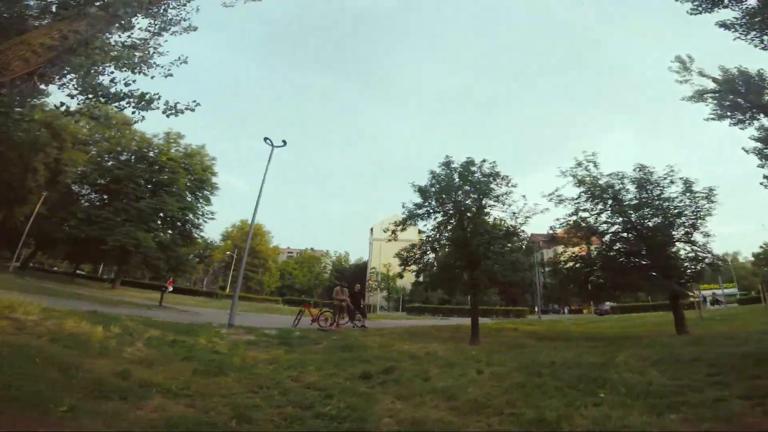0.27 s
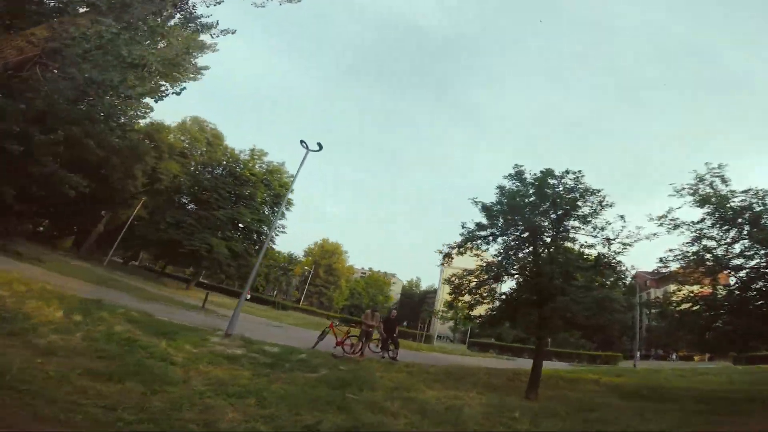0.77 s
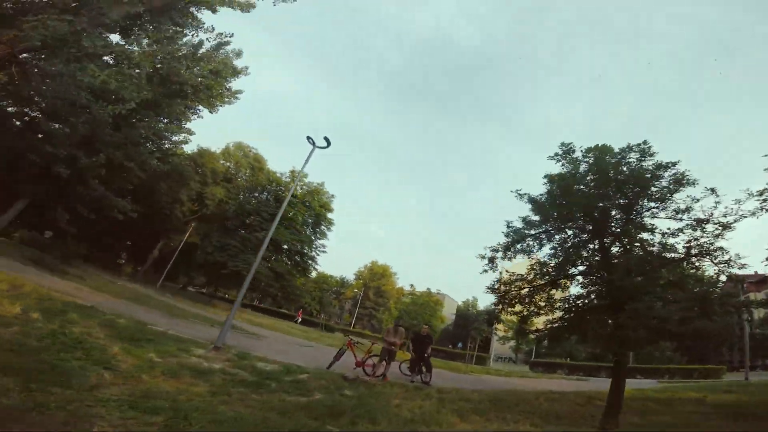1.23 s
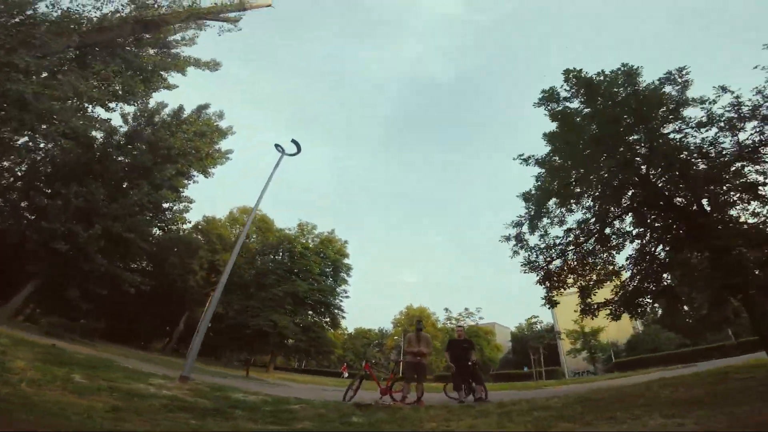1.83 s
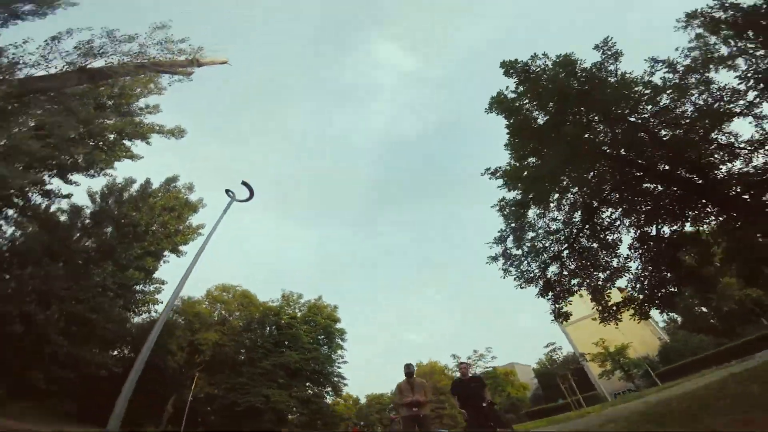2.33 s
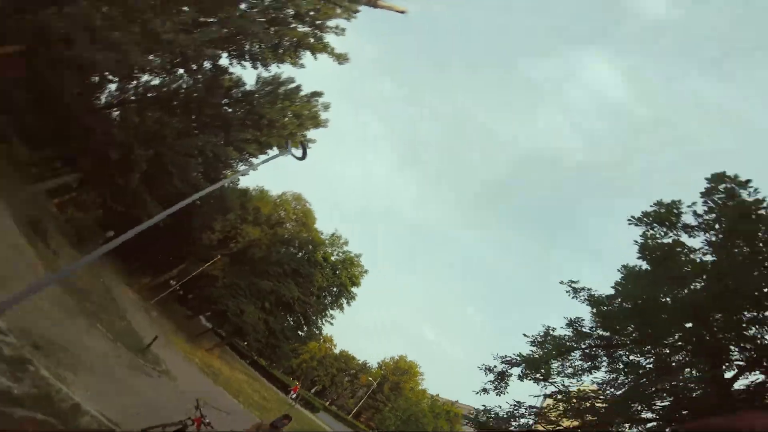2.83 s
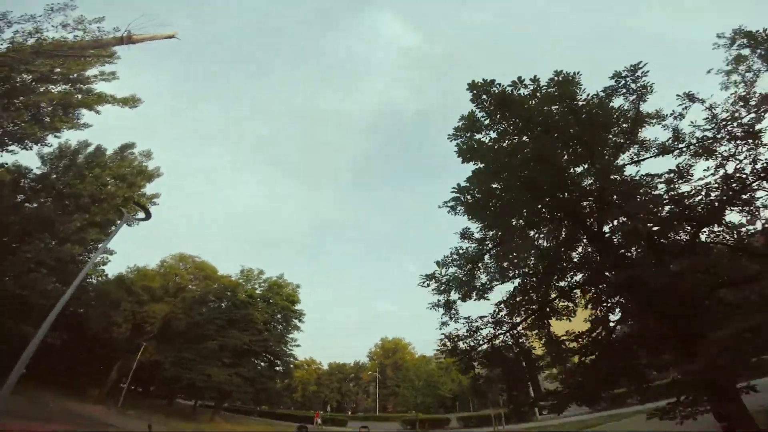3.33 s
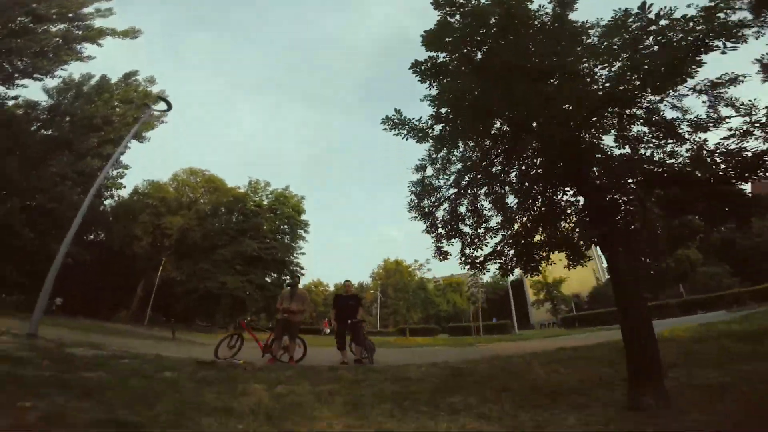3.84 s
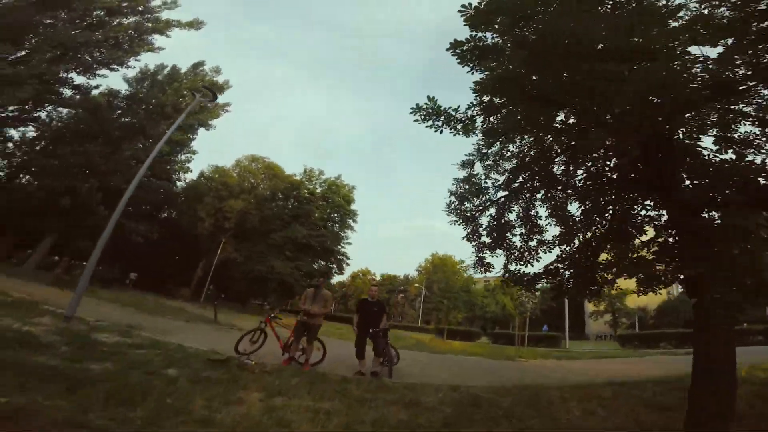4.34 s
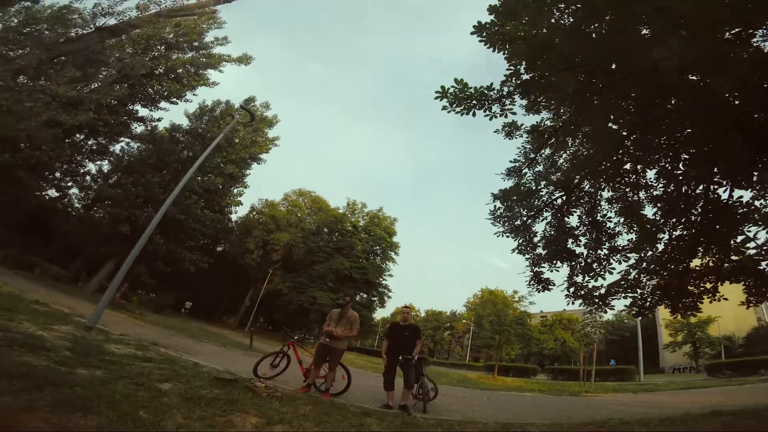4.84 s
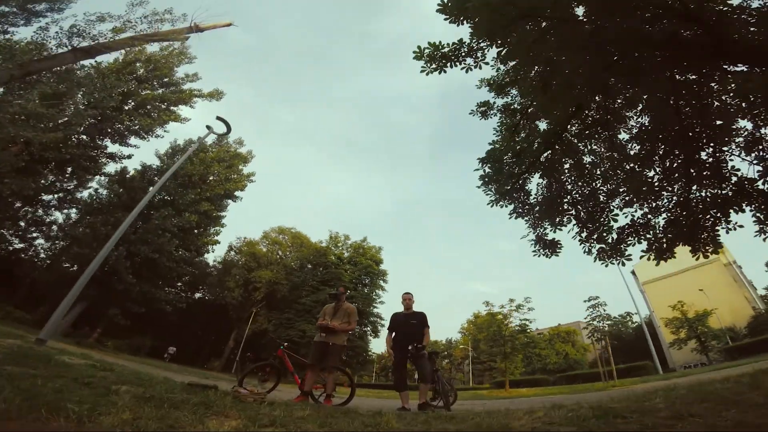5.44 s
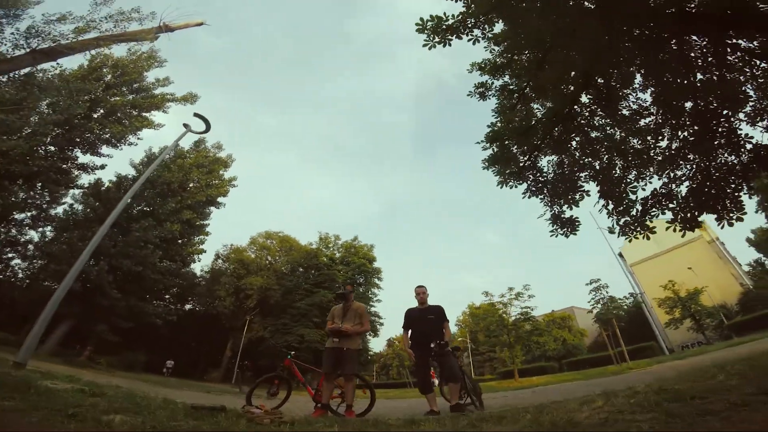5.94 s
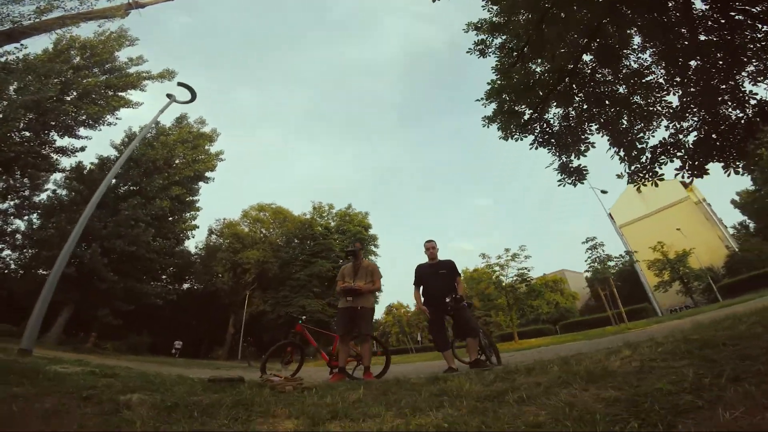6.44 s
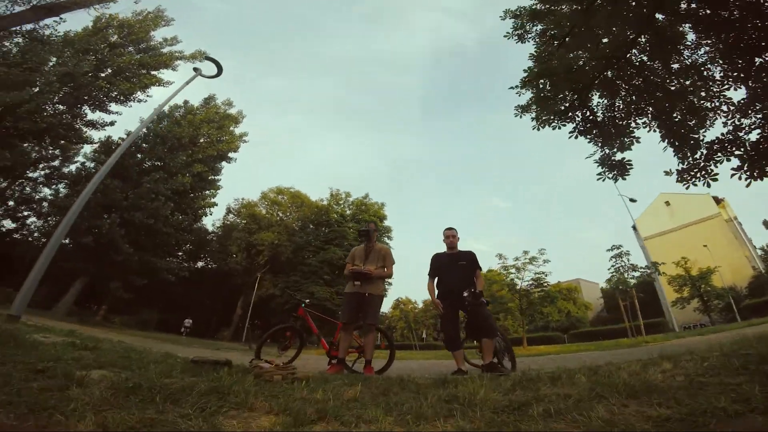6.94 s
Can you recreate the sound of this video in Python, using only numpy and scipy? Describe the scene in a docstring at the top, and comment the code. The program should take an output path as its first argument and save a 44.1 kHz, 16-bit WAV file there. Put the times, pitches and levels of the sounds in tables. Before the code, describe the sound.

A small four-rotor drone is heard from its own camera, very close and dry, outdoors. From 0 s it buzzes in a thick, beating hum with airy propeller wash, rising gently until 0.4 s, then sinking to a lower, rougher drone by 1.1 s. It climbs slowly and at 2.2 s leaps about an octave to a hard scream, peaking near 2.3 s and collapsing by 2.5 s. Until 3.4 s only thin, wavering electric whine, faint low chopping and airflow remain, with a rough, rasping blip at 2.7 s. Turbulent bursts surge at 3.6 s and 4.05 s, with a dip between, then drop to idle whine around 4.4 s. At 4.8 s the motors catch roughly and rise to 5.2 s, with low wind thumps. From 5.3 s the hover wavers, swelling at 5.7 and 6.75 s, before an abrupt upward rev at 7.1-7.2 s.

```python
"""A surging multi-rotor drone comes first: a small quadcopter flies low over a park, heard at its camera.
Four drifting motors turn three-bladed propellers: blades give harmonics of shaft speed, imbalance hums in the frame.
Wash, tip hiss, torn flow and wind are shaped noise; shaft speed and rough air set the levels of the rotor layers.
The throttle is punched and chopped twice; at idle mainly a thin electric whine and the airflow remain.
"""
import sys
import numpy as np
from scipy.fft import rfft, irfft, next_fast_len
from scipy.io import wavfile
from scipy.ndimage import uniform_filter1d, minimum_filter1d, map_coordinates

SR = 44100
rng = np.random.default_rng(int(sys.argv[2]) if len(sys.argv) > 2 else 0)


def master(y):
    """Save y as 16-bit WAV."""
    cut = np.clip(np.atleast_2d(y).T, -1, 1)
    pcm = np.round(cut * 32767)  # scale
    wavfile.write(sys.argv[1], SR, pcm.astype(np.int16))


N = 317079

# Faint steady hiss, relative density: frequency_hz, level_db_per_hz
FLOOR_SPECTRUM = [(1000, -0.5), (4000, -0.5), (7000, 0.5), (10000, 0), (12000, -8), (14000, -21),
                  (15500, -36)]
# Faint band-limited noise, opposite in the two channels, relative density: frequency_hz, level_db_per_hz
ANTIPHASE_SPECTRUM = [(150, -46), (260, -23.5), (340, -15), (385, 2.5), (440, -15), (560, -27), (720, -24),
                      (820, -6), (920, -38), (1900, -34.5), (2300, -24), (2800, -29), (5000, -49)]
# Level of the antiphase noise: time_s, level_db
ANTIPHASE_LEVEL = [(0, -50), (1.15, -49), (1.4, -79), (2.1, -61), (2.9, -58), (4.7, -69.5), (5.5, -92)]
# Wind on the microphone, dying down as the craft settles into a hover: time_s, level_db
WIND = [(0, -40.5), (.75, -42.5), (1.3, -34), (1.55, -37.5), (2.7, -38.5), (3, -44), (3.55, -34.5),
        (3.95, -37.5), (5.25, -37), (5.8, -45.5), (6.5, -44.5), (7.19, -41)]
# Gusts that thump the case in quick turns: centre_s, half_length_s, level_db
GUSTS = [(1.72, 0.083, -42), (2.205, 0.045, -35), (2.343, 0.033, -35), (2.428, 0.042, -36),
         (2.72, 0.07, -33), (3.342, .04, -39), (3.594, 0.13, -31), (4.798, 0.069, -34), (5.16, 0.077, -34)]
# Low wind rumble, relative density: frequency_hz, level_db_per_hz
RUMBLE_SPECTRUM = [(10, -6), (20, 5.5), (32, 1), (48, 3), (70, -3.5), (130, -23), (400, -76)]
# Wind buffeting, relative density: frequency_hz, level_db_per_hz
BUFFET_SPECTRUM = [(35, -27), (60, 4), (85, 0.5), (125, 1), (200, 4), (280, -19.5), (400, -18.5),
                   (900, -72)]
# Propeller wash, relative density: frequency_hz, level_db_per_hz
WASH_SPECTRUM = [(120, -26), (220, -21), (290, -12), (400, 8), (560, 0), (800, -1), (1100, -6), (1700, -7),
                 (2300, -17.5), (3000, -14), (3700, -30), (6000, -49), (12000, -79)]
# Flow torn by the blades in rough air, relative density: frequency_hz, level_db_per_hz
TEARING_SPECTRUM = [(2500, -25), (3900, 0), (4700, 5), (6000, 1.5), (8000, -10), (11000, -28)]
# Blade tip hiss, relative density: frequency_hz, level_db_per_hz
HISS_SPECTRUM = [(900, -38.5), (2000, 4.5), (2500, 0), (3050, 11), (3500, -1), (4100, -10), (5300, 0),
                 (6500, 4), (7600, -1.5), (9200, -5.5), (11000, -17.5), (13000, -25), (15500, -37)]
# Left-right correlation of the tip hiss: frequency_hz, correlation_ratio
EAR_LIKENESS = [(2000, 1), (5000, 1), (8000, 1), (12000, 0.99)]
# Difference between the two microphone ports: frequency_hz, level_db
PORT_DIFFERENCE = [(60, -52), (110, -63), (200, -70), (380, -54), (700, -63), (1290, -54.5), (2380, -36),
                   (4400, -33), (8120, -1), (15000, -3)]
# How the camera case passes the motor whine: frequency_hz, gain_db
CASE_RESPONSE = [(3500, -2), (4500, -6), (5100, -1), (5800, -4), (6500, 2), (7100, -8), (8300, -2),
                 (9500, -4), (11000, -11), (12000, -18), (15000, -43)]
# The motors: name, trim_share_of_shaft_speed, imbalance_db, blade_tone_db, overtones_db, whine_db
MOTORS = [("a", 0, -2.1, -0.21, -1.8, -2.6), ("b", -.075, -17.5, -4.5, -11.5, -6),
          ("c", .05, -13.5, -7, -7.5, -10), ("d", .115, -10, -9.5, -8.5, -9)]
# Tones from slightly unequal blades: multiple_of_shaft_speed, level_db
SHAFT_ORDERS = [(2, -15.5), (4, -24), (5, -33.5)]
# Overtones of the blade tone: multiple_of_shaft_speed, level_db
BLADE_ORDERS = [(6, -18.5), (9, -25), (12, -32), (15, -34.5), (18, -37), (21, -41), (24, -47)]
# Throttle: cruise, punch, chop and roll with a blip, two bursts, chop, recovery, hover, last punch:
# time_s, shaft_speed_hz
THROTTLE = [(0, 170), (.1, 173), (.22, 192), (.42, 199), (.62, 170), (.82, 149), (1.12, 144), (1.4, 147),
            (1.55, 159), (1.76, 170), (2.145, 173), (2.25, 347), (2.305, 382), (2.335, 374), (2.379, 350),
            (2.394, 268), (2.408, 168), (2.43, 115), (2.475, 100), (2.51, 64), (2.58, 64), (2.68, 85),
            (2.72, 110), (2.77, 106), (2.82, 88), (2.97, 68), (3.1, 61), (3.18, 58), (3.35, 60), (3.41, 66),
            (3.47, 86), (3.605, 256), (3.65, 252), (3.79, 203), (3.88, 192), (4.02, 277), (4.075, 284),
            (4.22, 198), (4.3, 115), (4.39, 70), (4.48, 63), (4.68, 80), (4.8, 143), (4.93, 150), (5, 190),
            (5.18, 238), (5.25, 220), (5.34, 170), (5.55, 165), (5.71, 204), (5.97, 146), (6.19, 146),
            (6.3, 172), (6.62, 178), (6.74, 202), (6.88, 166), (7.11, 159), (7.19, 302)]
# Base levels from idle to full throttle; the frame hums most around a hover:
# shaft_speed_hz, hum_db, blade_db, wash_db, tip_hiss_db, trim_share
LEVELS_BY_SPEED = [(59.6, -60, -40.5, -40, -70, .6), (85.13, -48, -42, -41, -64, .6),
                   (114.2, -33.5, -35, -38.5, -58, .8), (149.8, -25, -32, -39.5, -51.5, .75),
                   (195.2, -23, -29.5, -41, -50.5, .62), (239.6, -31.5, -29.5, -42, -49, .4),
                   (368.7, -28.5, -27.5, -44, -48.5, .33)]
# Roughness of the air, highest when the craft falls into its own wash: time_s, roughness_db
TURBULENCE = [(0, -1), (.85, -1.55), (1.25, 3.5), (2.13, 1.5), (2.37, -2.5), (2.46, -.5), (2.53, -5),
              (2.68, -4), (2.717, 7), (2.745, -2), (2.97, -4), (3.48, 8), (3.6, 3.5), (3.86, 1),
              (4.44, -0.17), (4.79, 7), (5.24, 3), (5.35, -0.11), (6.19, -0.2), (7.19, 0)]
# Single motors pushed or eased to steer: forward lean, start and stop of the roll, levelling at idle,
# catching the fall: motor_name, centre_s, half_length_s, extra_shaft_speed_hz, extra_blades_and_whine_db
NUDGES = [("d", 0.298, 0.2, 2, 4.9), ("d", 1.97, .3, 8, 4.4), ("b", 1.97, .3, -3, 0.82),
          ("d", 2.417, .02, 140, 2.1), ("d", 2.455, .035, 45, 1.5), ("c", 2.44, .04, 50, 1),
          ("a", 2.66, .04, 40, 3.5), ("d", 2.72, .024, 138, 4.3), ("b", 2.712, .02, 95, 0),
          ("c", 2.742, .028, 48, 8.7), ("a", 2.92, 0.099, 0, -5), ("a", 3.14, 0.051, 0.99, 2.5),
          ("a", 3.245, .035, -11, 1), ("a", 3.34, 0.0601, 1.5, 4.9), ("c", 3.21, .075, 11, 5),
          ("d", 3.25, .1, 17, 3.1), ("d", 3.53, .05, 25, 5.7), ("a", 4.44, 0.069, 0, -5),
          ("a", 4.75, 0.066, 0, 4), ("d", 4.83, .04, 14, 3), ("c", 4.92, .05, 12, 2.4),
          ("d", 5.04, 0.0497, 5.98, 2.6), ("a", 5.15, 0.1185, -3, 1), ("b", 5.47, 0.1404, 2.005, 9.8)]

# Shaft speed that counts as zero load; scales of its rate of change for full effort and for rocking
HOVER_HZ = 175
HARD_SURGE_HZ_PER_S, HARD_BRAKE_HZ_PER_S, JOLT_HZ_PER_S = 3300, 2400, 600
# dB gained per dB of roughness; the case ring gains only in rough air, tearing gains on top of the tips
ROUGH_BLADES, ROUGH_WASH, ROUGH_TIPS, ROUGH_WHINE, ROUGH_STEERING = 0.23, 0.68, 0.97, .5, .63
ROUGH_TEARING, ROUGH_RING, ROUGH_OVERTONES = 1, 1.1, .85
# Blades tear at the air while they speed up: dB at full surge; overtones gain only near or below a hover
SURGE_TIPS_DB, SURGE_WASH_DB, SURGE_OVERTONES_DB = 3.5, 2.5, 7
# Braking unloads the rotors: dB at full braking
BRAKE_HUM_DB, BRAKE_BLADES_DB, BRAKE_EDGE_DB = -3, -6.5, -5.5
BRAKE_SCREAM_DB = 1  # stalled blades rasp: dB per octave of overtones at full braking
# Changing torque rocks the frame while the rotors are slow: dB at full rocking
JOLT_HUM_DB, JOLT_BUFFET_DB = 16, 10
CHANGE_SPREAD, JOLT_SPREAD = .4, 1.5  # extra shares of motor trim during hard changes and rocking
HUNT_HZ, HUNT_RATE = 1.8, 14  # idle speed hunting: scale in Hz, knots per second
# Whine: base level, gain at full torque, flutter scale, and fading above a shaft speed
WHINE_DB, WHINE_TORQUE_DB, WHINE_FLUTTER_DB = -66.5, 5.5, 3
WHINE_FADE_HZ, WHINE_FADE_DB_PER_HZ = 128, 2
RUMBLE_UNDER_WIND_DB, TEARING_RE_TIPS_DB, RING_DB = -9.5, -14, -71  # base levels
TOP_HZ = 15400  # upper band limit


def amp(db):
    """Logarithmic level: decibels become an amplitude gain."""
    return 10 ** (np.asarray(db) / 20)


def unit(x):
    """Normalization: the signal is scaled to an rms of 1."""
    return x / np.sqrt(np.mean(x ** 2) + 1e-20)


def along(points, hz):
    """Logarithmic frequency: (Hz, value) points are interpolated on a log axis."""
    frequency, value = np.transpose(points)
    return np.interp(np.log(hz + 1), np.log(frequency + 1), value)


def curves(rows):
    """Time control: each column after the time becomes one value per sample."""
    s, *columns = np.transpose(rows)
    return [np.interp(np.arange(N) / SR, s, column) for column in columns]


def pulse(centre_s, half_s):
    """Gaussian transient: a peak of 1 falls to 1/e at the half length."""
    t = np.arange(N) / SR
    return np.exp(-((t - centre_s) / half_s) ** 2)


def wobble(rate):
    """Random modulation: a smooth curve passes through rate random knots a second."""
    knots = rng.standard_normal(int(N * rate / SR) + 4)
    return map_coordinates(knots, [np.arange(N) * rate / SR])


def filtered(x, response):
    """Linear filtering: the spectrum is multiplied by a response of frequency."""
    size = next_fast_len(N + 8192)
    spectrum = rfft(x, size) * response(np.fft.rfftfreq(size, 1 / SR))
    return irfft(spectrum, size)[..., :N]


def noise(spectrum):
    """Spectral shaping: white noise is coloured and scaled to an rms of 1."""
    return unit(filtered(rng.standard_normal(N), lambda hz: amp(along(spectrum, hz))))


def by_speed(speed):
    """Operating point: the shaft speed selects each column of base levels."""
    hz, *columns = np.transpose(LEVELS_BY_SPEED)
    return [np.interp(speed, hz, column) for column in columns]


def effort(speed):
    """Angular acceleration: surge, braking and any torque change are each rated 0-1."""
    rate = np.gradient(speed) * SR
    surge = np.tanh(np.maximum(rate, 0) / HARD_SURGE_HZ_PER_S)
    brake = np.clip(-rate / HARD_BRAKE_HZ_PER_S, 0, 1) ** 2
    jolt = np.tanh(np.abs(rate) / JOLT_HZ_PER_S)
    return surge, brake, jolt


def steady_hiss():
    """Stationary noise: a faint hiss keeps a constant level."""
    return amp(-68.0) * noise(FLOOR_SPECTRUM)


def antiphase_noise():
    """Antiphase: faint noise, opposite in the two channels, drops away early, partly returns, then sinks."""
    level_db, = curves(ANTIPHASE_LEVEL)
    side = amp(level_db) * noise(ANTIPHASE_SPECTRUM)
    return np.array([side, -side])


def airflow(load, wash_db, rocking):
    """Turbulent flow: wind buffets the microphone and wash rushes past, duller from slow rotors."""
    wind_db, = curves(WIND)
    gusts = sum(amp(db) * pulse(s, half) for s, half, db in GUSTS)
    rumble_gain = np.hypot(amp(wind_db + RUMBLE_UNDER_WIND_DB), gusts)
    rumble = rumble_gain * amp(1.2 * wobble(8.8)) * noise(RUMBLE_SPECTRUM)
    buffet = amp(wind_db + JOLT_BUFFET_DB * rocking + 2.5 * wobble(14)) * noise(BUFFET_SPECTRUM)

    bright = noise(WASH_SPECTRUM)
    dull = filtered(bright, lambda hz: 1 / np.sqrt(1 + (hz / 1900) ** 4))
    idling = np.clip(-.7 * load, 0, 1)
    wash = amp(wash_db + 0.93 * wobble(60)) * (bright + idling * (dull - bright))
    return rumble + buffet + wash


def torn_flow(tips_db, rough_db):
    """Flow separation: blades in rough air tear the flow into noise, its gain capped at 4 dB of roughness."""
    rough_gain_db = (ROUGH_TIPS + ROUGH_TEARING) * np.minimum(rough_db, 4)
    return amp(tips_db + TEARING_RE_TIPS_DB + rough_gain_db) * noise(TEARING_SPECTRUM)


def tip_hiss(angles, chop):
    """Amplitude modulation: tip turbulence pulses with passing blades; its top differs between the ears."""
    pulsing = unit(np.exp(chop * sum(np.cos(3 * angle) for angle in angles)))  # three blades
    # Mid and side shares that give the left-right correlation
    turn = lambda hz: np.arccos(np.clip(along(EAR_LIKENESS, hz), -1, 1)) / 2
    mid = filtered(noise(HISS_SPECTRUM), lambda hz: np.cos(turn(hz)))
    side = filtered(noise(HISS_SPECTRUM), lambda hz: np.sin(turn(hz)))
    return pulsing * np.array([mid + side, mid - side])


def case_ring(ring_hz, width_hz):
    """Resonance: motor vibration keeps one high mode of the case ringing."""
    resonance = lambda hz: 1 / (1 + ((hz - ring_hz) / width_hz) ** 2)
    return unit(filtered(rng.standard_normal(N), resonance)) * amp(2.1 * wobble(11.0))


def whine(angles, speeds, extra_db, blur_hz):
    """Magnetic cogging: magnets pass stator teeth, singing while slow and louder as they spin up."""
    voices = 0
    for (*_, motor_db), angle, speed, extra in zip(MOTORS, angles, speeds, extra_db):
        torque = np.tanh(np.maximum(np.gradient(speed) * SR, 0) / JOLT_HZ_PER_S)
        fade_db = WHINE_FADE_DB_PER_HZ * np.maximum(speed - WHINE_FADE_HZ, 0)
        level_db = WHINE_DB + motor_db + extra + WHINE_TORQUE_DB * torque - fade_db
        blur = 2 * np.pi * np.cumsum(blur_hz * wobble(900)) / SR
        flutter = amp(WHINE_FLUTTER_DB * (wobble(45) + wobble(11)))
        voices = voices + amp(level_db) * np.sin(84 * angle + blur) * flutter  # 84 cogs a turn
    return filtered(voices, lambda hz: amp(along(CASE_RESPONSE, hz)))


def nudged(name):
    """Differential thrust: steering adds shaft speed (Hz) and level (dB) to one motor."""
    return sum(np.outer([hz, db], pulse(s, half))
               for motor, s, half, hz, db in NUDGES if motor == name)


def motor_speeds(speed, steering, extra_hz, drift_hz, drift_rate):
    """Detuning: each motor follows the throttle with its own trim, drift and steering."""
    return [speed + steering * (trim * speed + drift_hz * wobble(drift_rate)) + extra
            for (_, trim, *_), extra in zip(MOTORS, extra_hz)]


def shaft_angle(speed, jitter_hz, jitter_rate):
    """Phase integration: the shaft turns with quick jitter under power and slow hunting at idle."""
    drive = np.minimum(speed / HOVER_HZ, 1) ** 2
    jitter = drive * jitter_hz * wobble(jitter_rate)
    hunting = (1 - drive) ** 2 * HUNT_HZ * wobble(HUNT_RATE)
    return 2 * np.pi * (np.cumsum(speed + jitter + hunting) / SR + rng.random())


def hum(angles):
    """Rotating imbalance: each unbalanced rotor shakes the frame once a turn."""
    return unit(sum(amp(db + 0.33 * wobble(45)) * np.sin(angle)
                    for angle, (_, _, db, *_) in zip(angles, MOTORS)))


def partials(angle, orders, flutter_db):
    """Harmonic series: tones locked to one shaft flutter together in the uneven inflow."""
    tones = sum(amp(db) * np.sin(order * angle + 2 * np.pi * rng.random()) for order, db in orders)
    return tones * amp(flutter_db * wobble(45))


def blades(motor, angle, speed, rough_db, bite_db, scream_db):
    """Periodic blade loading: three blades chop the air over the arm; load sharpens the chops to a scream."""
    *_, tone_db, overtone_db, _ = motor
    load = np.log2(speed / HOVER_HZ)
    surge, brake, _ = effort(speed)
    bite = bite_db * np.clip(load, 0, .45)
    # Rough air and surges sharpen the chops
    bite = bite + ROUGH_OVERTONES * rough_db + SURGE_OVERTONES_DB * surge * np.clip(1 - load, 0, 1)
    # dB per octave of overtones, so the highest gain most
    scream = scream_db * np.maximum(load - .25, 0) + BRAKE_SCREAM_DB * brake
    lowest_order = BLADE_ORDERS[0][0]
    overtones = [(order, db + bite + scream * np.log2(order / lowest_order)) for order, db in BLADE_ORDERS]

    tone = partials(angle, [(3, 0)], flutter_db=2)  # blade-pass fundamental
    tone = tone + partials(angle, SHAFT_ORDERS, flutter_db=1.0)
    edge = partials(angle, overtones, flutter_db=4.0)
    tone_gain = amp(tone_db + BRAKE_BLADES_DB * brake)
    edge_gain = amp(overtone_db + BRAKE_EDGE_DB * brake)
    return amp(by_speed(speed)[1]) * (tone_gain * tone + edge_gain * edge)


def ports(x):
    """Phase difference: sound reaches two close ports with a slight quadrature difference."""
    side = filtered(x, lambda hz: 1j * amp(along(PORT_DIFFERENCE, hz)))
    return np.array([x + side, x - side])


def scene():
    """Superposition: the four rotors and the air around them add at the microphone."""
    speed = uniform_filter1d(curves(THROTTLE)[0], size=1000, mode="nearest")  # rotor inertia
    rough_db, = curves(TURBULENCE)
    hum_db, *_, spread = by_speed(speed)
    hum_db = uniform_filter1d(hum_db, size=4000, mode="nearest")  # the frame's shaking takes time to build
    surge, brake, jolt = effort(speed)
    rocking = jolt * np.maximum(1 - speed / HOVER_HZ, 0)
    load = np.log2(speed / HOVER_HZ)  # octaves of shaft speed above a hover

    # In rough air the motors pull apart to hold the attitude
    steering = spread * amp(ROUGH_STEERING * rough_db)
    steering = steering + CHANGE_SPREAD * (surge + brake) + JOLT_SPREAD * rocking
    extra_hz, extra_db = zip(*[nudged(name) for name, *_ in MOTORS])
    speeds = motor_speeds(speed, steering, extra_hz, drift_hz=2.8, drift_rate=9)
    angles = [shaft_angle(v, jitter_hz=1.712, jitter_rate=55) for v in speeds]
    _, _, wash_db, tips_db, _ = by_speed(np.mean(speeds, axis=0))

    floor = steady_hiss()
    air = airflow(load, wash_db + ROUGH_WASH * rough_db + SURGE_WASH_DB * surge, rocking)
    tearing = torn_flow(tips_db, rough_db)
    tips_gain = amp(tips_db + ROUGH_TIPS * rough_db + SURGE_TIPS_DB * surge + 0.61 * wobble(30))
    tips = tips_gain * tip_hiss(angles, chop=0.19)
    # Rough air also shakes the case
    ring = amp(RING_DB + ROUGH_RING * np.maximum(rough_db, 0)) * case_ring(ring_hz=6380, width_hz=100)
    motors = amp(ROUGH_WHINE * rough_db) * whine(angles, speeds, extra_db, blur_hz=89) + ring
    frame_hum = amp(hum_db + BRAKE_HUM_DB * brake + JOLT_HUM_DB * rocking) * hum(angles)
    chopping = sum(
        amp(db + ROUGH_BLADES * rough_db) * blades(motor, angle, v, rough_db, bite_db=8.0, scream_db=0.5)
        for motor, angle, v, db in zip(MOTORS, angles, speeds, extra_db))
    through_ports = ports(floor + air + tearing + motors + frame_hum + chopping)
    return through_ports + tips + antiphase_noise()


def limiter(x, knee_db, hold_s):
    """Dynamic compression: the camera turns its gain down around the loudest peaks, at a ratio of 5."""
    size = max(int(hold_s * SR), 2)
    peak = np.abs(x).max(axis=0) + 1e-9
    needed = np.minimum(1, amp(knee_db) / peak) ** (1 - 1 / 5)
    return x * uniform_filter1d(minimum_filter1d(needed, size), size)


def record(dry):
    """Band limitation: peak limiting comes first, then the camera's upper cutoff."""
    limited = limiter(dry * amp(1.0), knee_db=-17.0, hold_s=0.0074)
    return filtered(limited, lambda hz: hz < TOP_HZ)


dry = scene()
out = record(dry)
master(out)
```